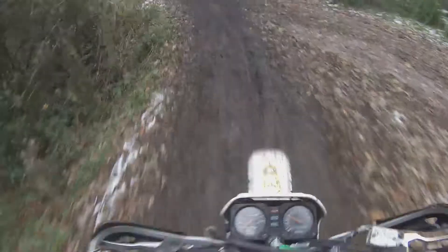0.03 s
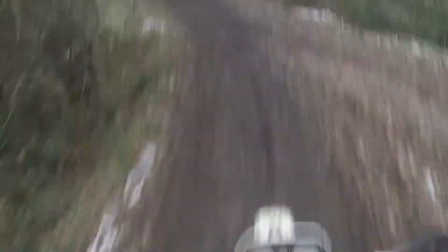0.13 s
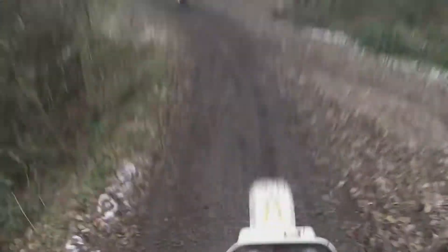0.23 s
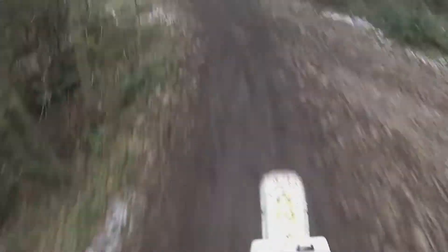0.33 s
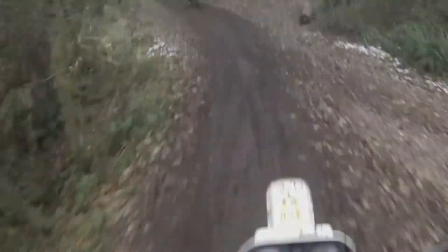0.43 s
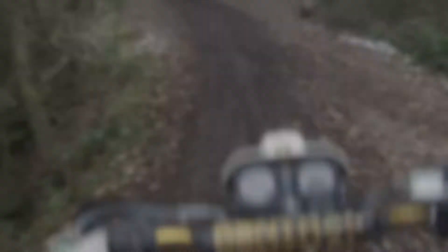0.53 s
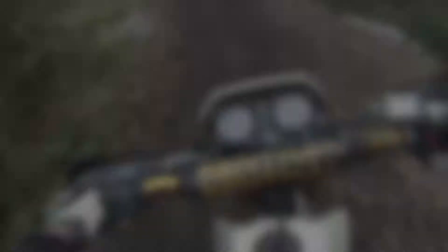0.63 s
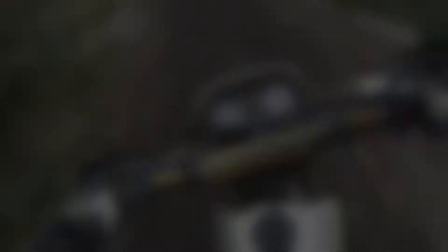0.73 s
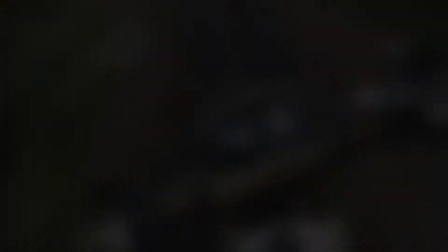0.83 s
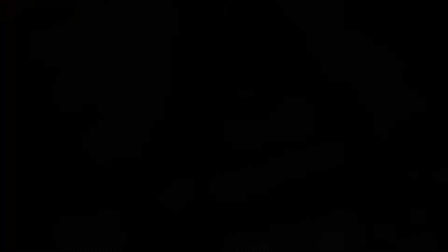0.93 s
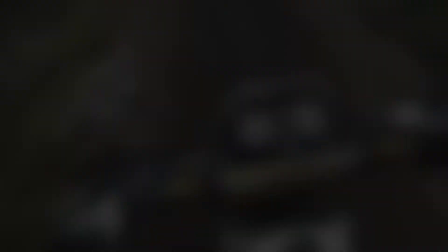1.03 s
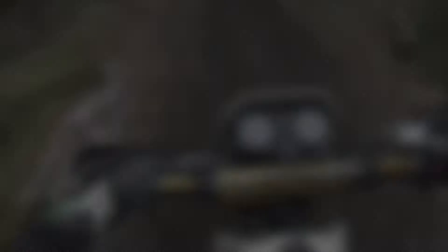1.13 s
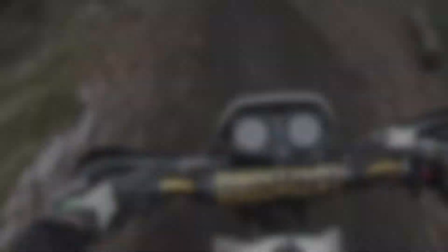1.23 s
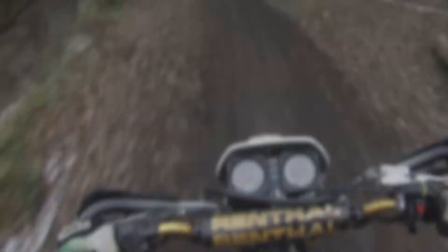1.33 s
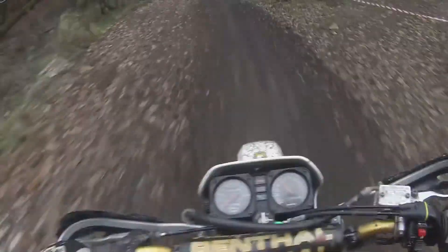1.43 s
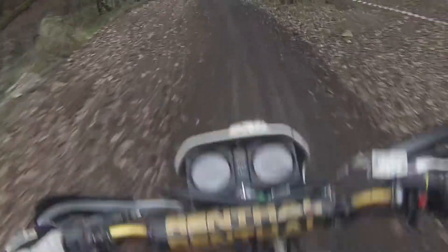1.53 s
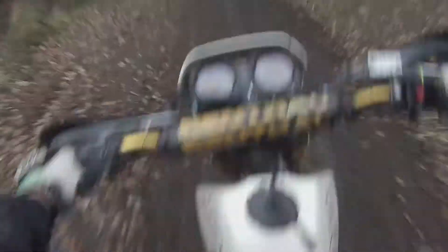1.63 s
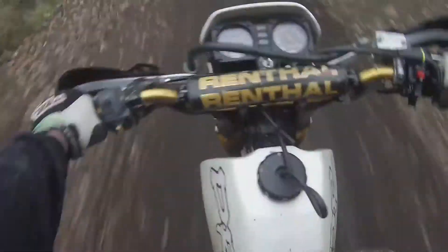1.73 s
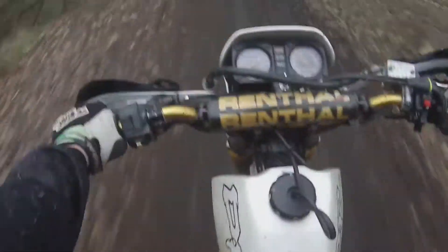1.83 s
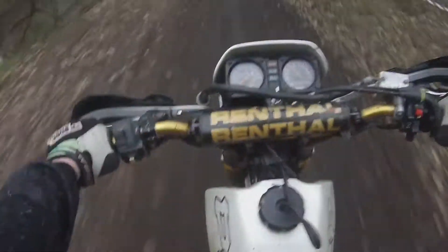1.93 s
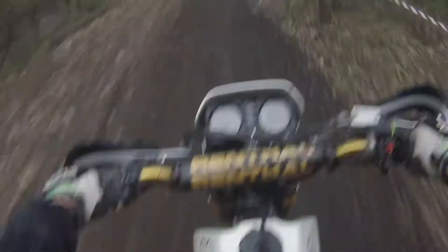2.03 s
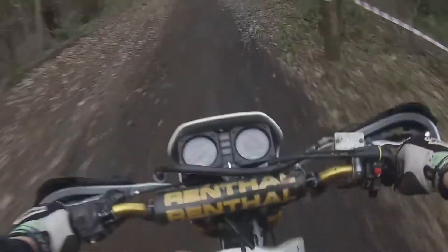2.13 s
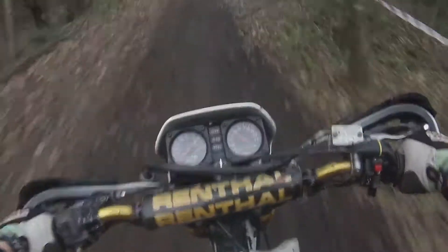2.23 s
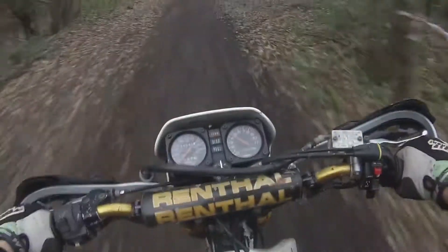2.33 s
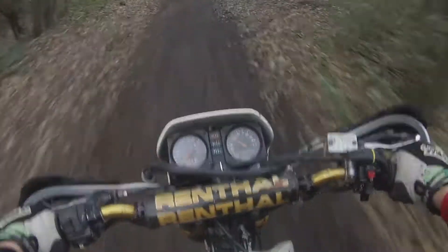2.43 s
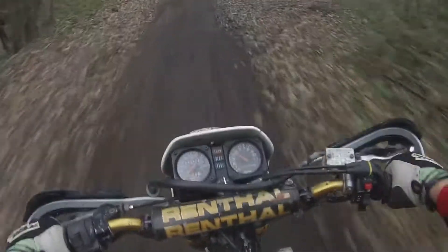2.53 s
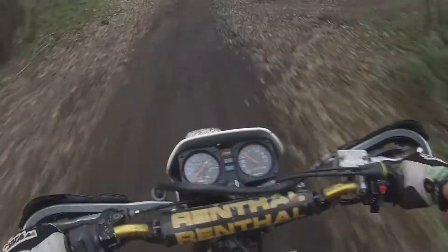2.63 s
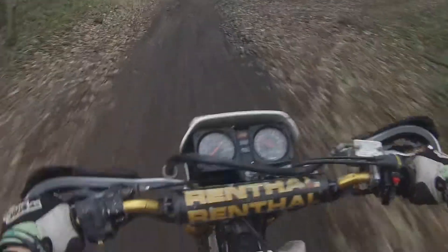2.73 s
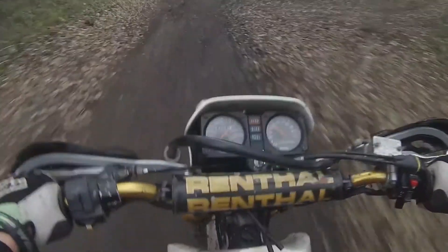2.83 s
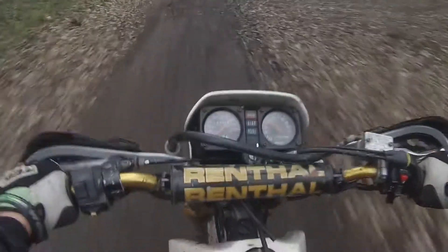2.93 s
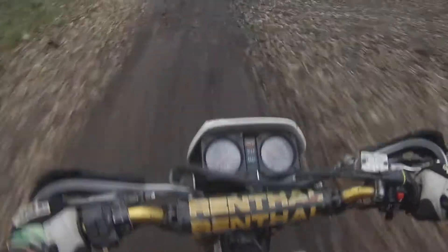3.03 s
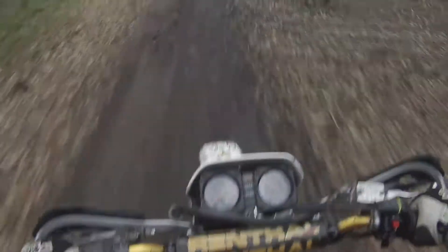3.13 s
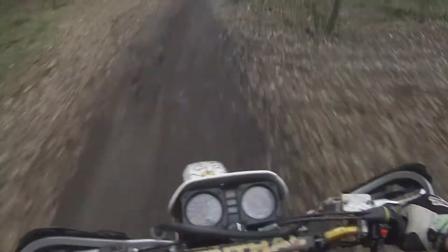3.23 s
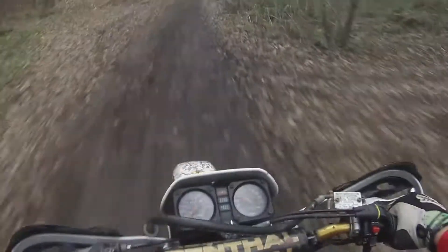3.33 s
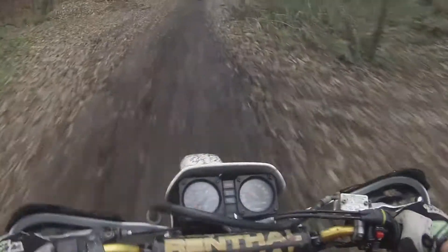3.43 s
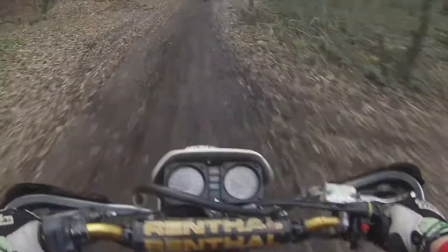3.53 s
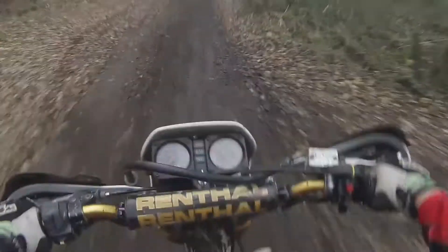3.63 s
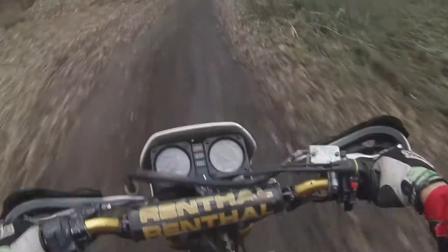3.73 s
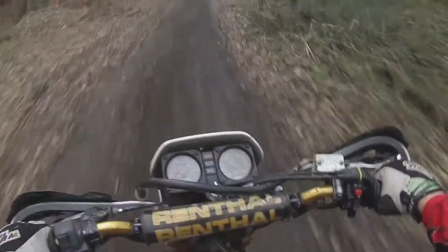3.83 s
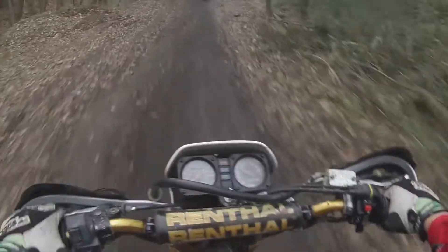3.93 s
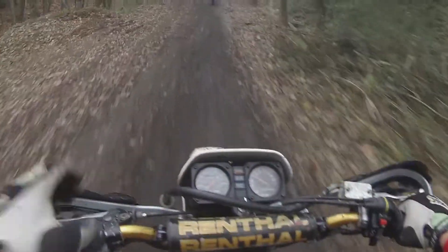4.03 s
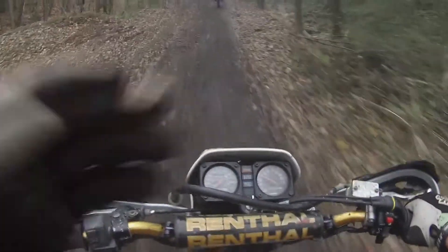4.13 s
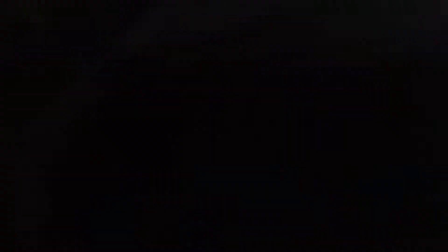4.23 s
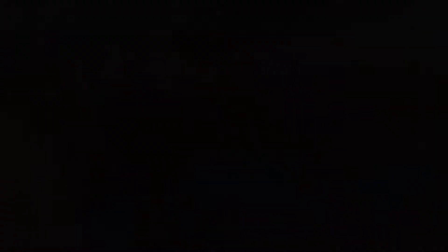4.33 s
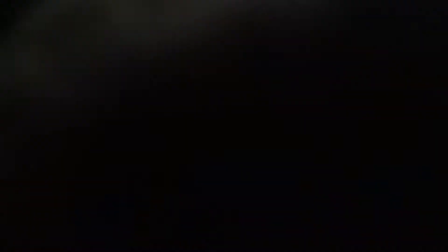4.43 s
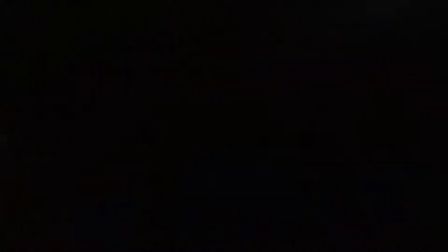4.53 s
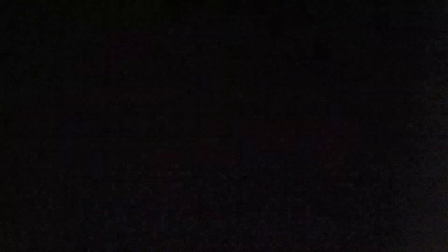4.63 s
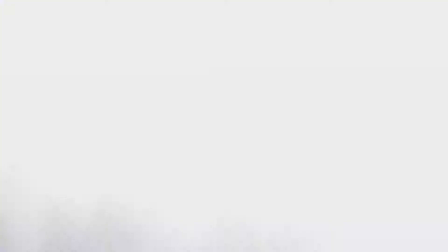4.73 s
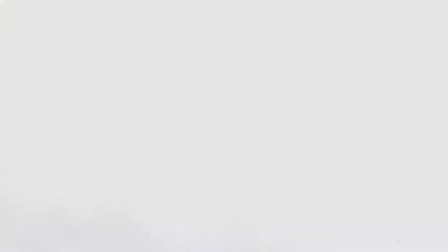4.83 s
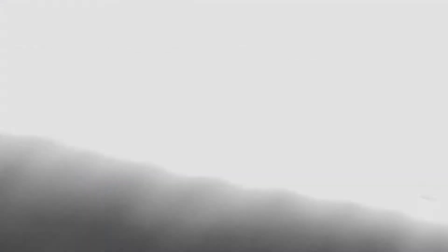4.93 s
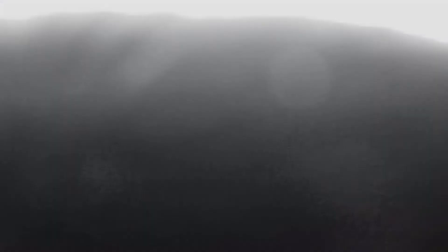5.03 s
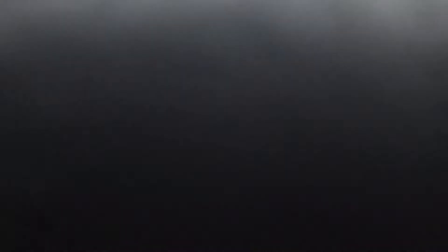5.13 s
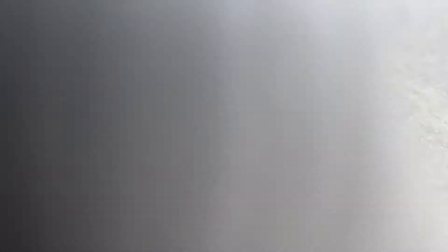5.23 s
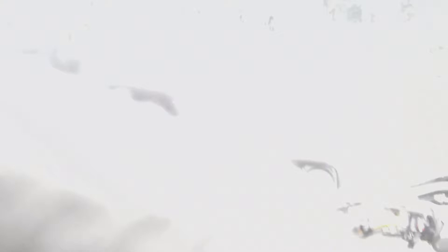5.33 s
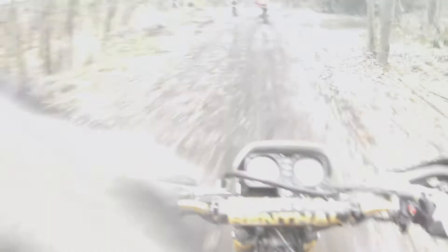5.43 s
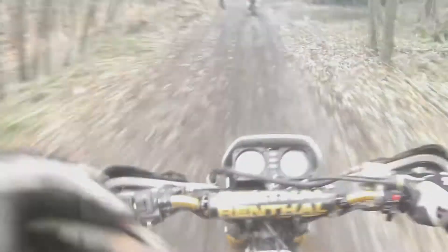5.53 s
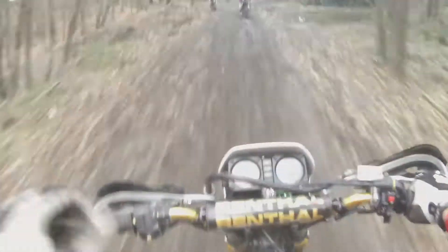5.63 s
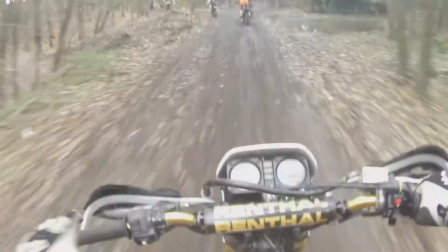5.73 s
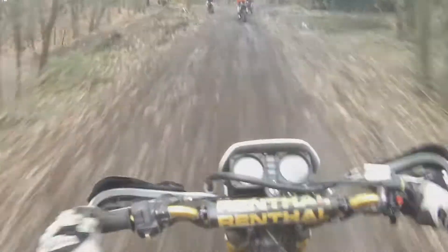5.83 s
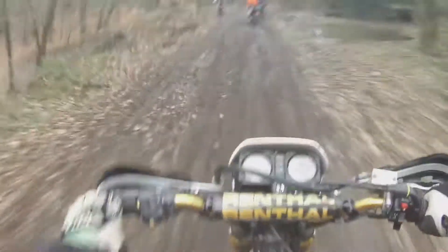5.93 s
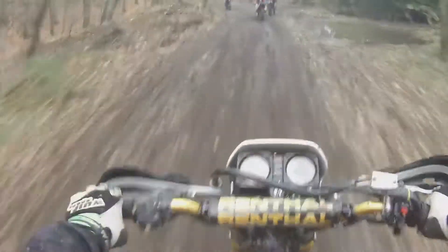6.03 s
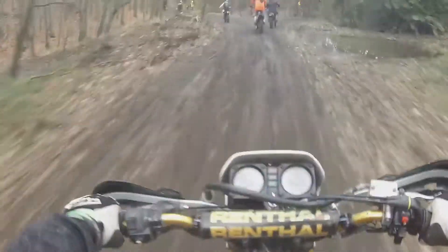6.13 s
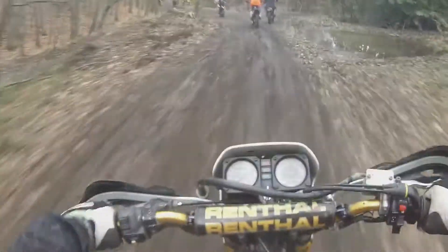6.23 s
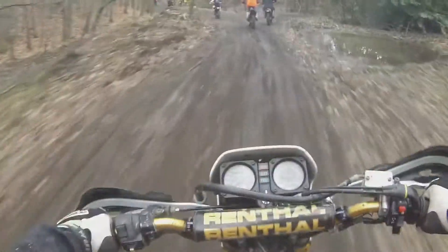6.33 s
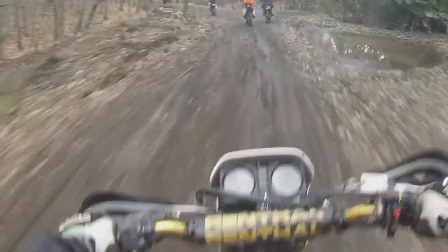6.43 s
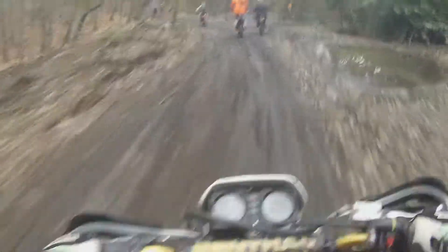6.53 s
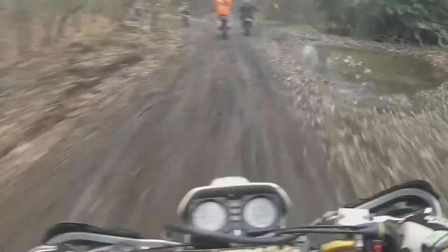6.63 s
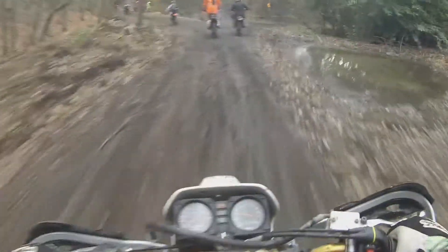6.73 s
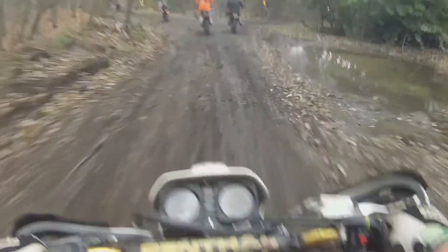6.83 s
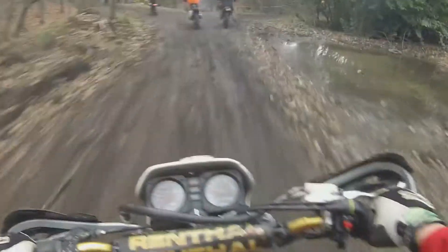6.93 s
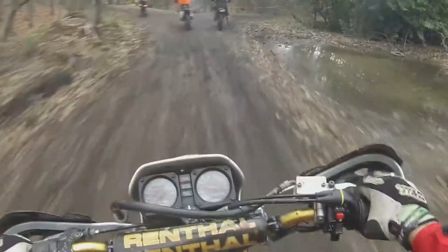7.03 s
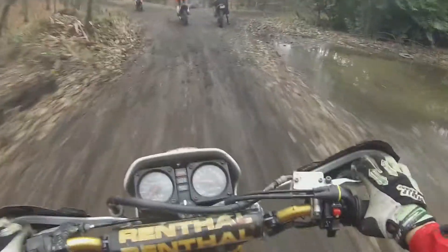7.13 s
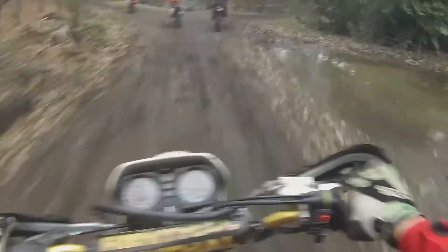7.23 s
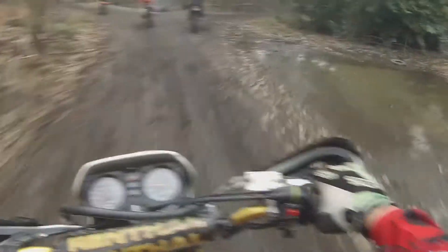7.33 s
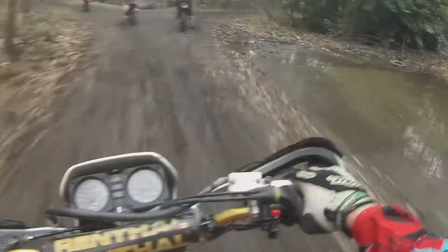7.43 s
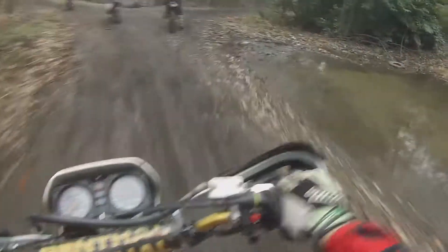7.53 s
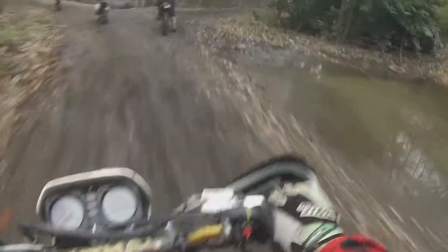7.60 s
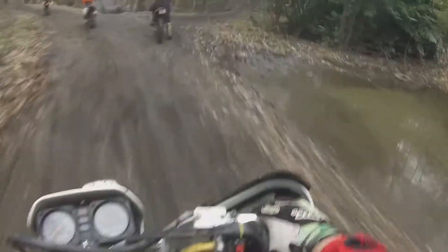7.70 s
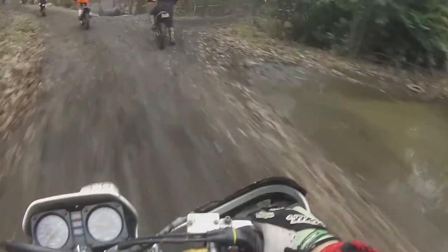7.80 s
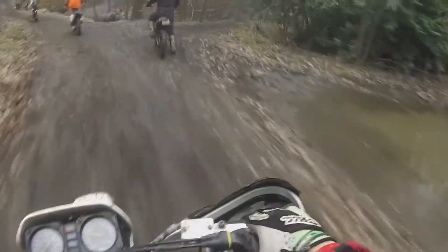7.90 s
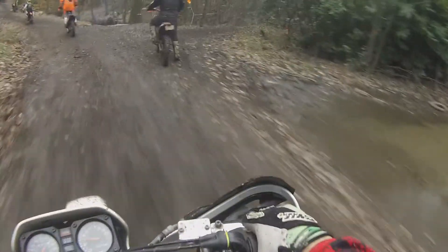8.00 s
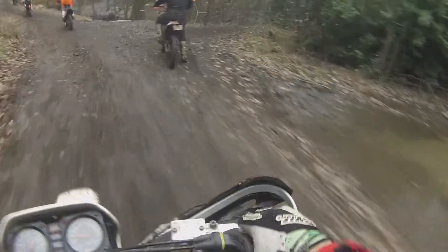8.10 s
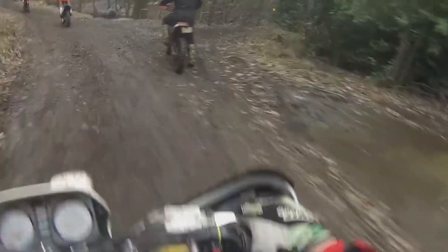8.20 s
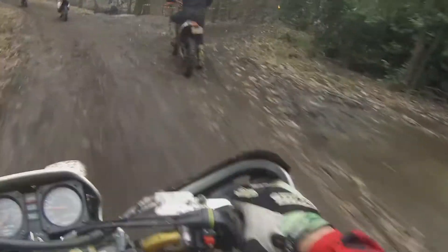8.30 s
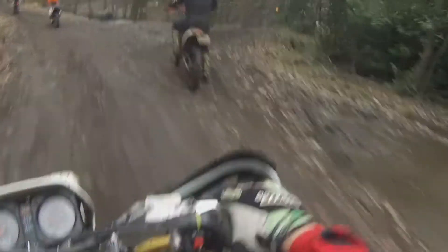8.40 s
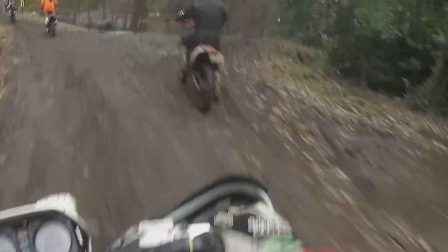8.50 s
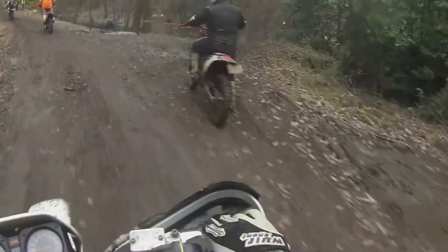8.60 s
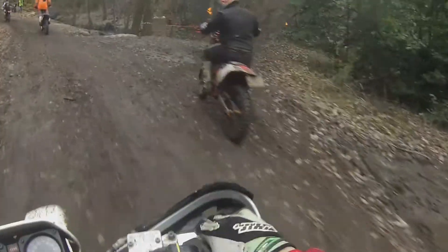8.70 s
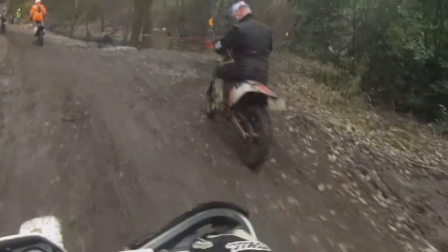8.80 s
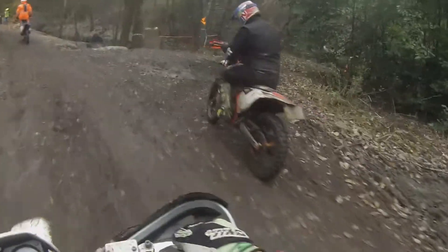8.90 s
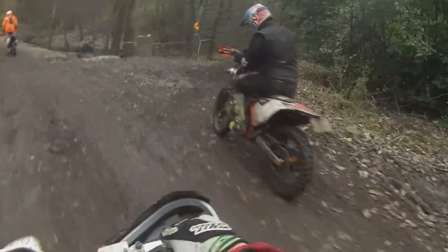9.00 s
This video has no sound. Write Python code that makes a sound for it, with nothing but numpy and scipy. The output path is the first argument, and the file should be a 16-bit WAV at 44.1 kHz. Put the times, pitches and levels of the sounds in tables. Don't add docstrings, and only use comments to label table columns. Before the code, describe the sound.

A single-cylinder trail bike barks and eases along a rough track, two hard knocks and rubbing hit the microphone housing, then a two-stroke screams nearby.

```python
import sys
import numpy as np
from scipy import signal
from scipy.io import wavfile
from scipy.ndimage import uniform_filter1d

SR = 44100
rng = np.random.default_rng(int(sys.argv[2]) if len(sys.argv) > 2 else 0)


def digitize_waveform(pressure):
    field = np.atleast_2d(pressure).T
    bounded = np.clip(field, -1, 1)
    quanta = np.round(bounded * 32767).astype(np.int16)
    wavfile.write(sys.argv[1], SR, quanta)


def gain_from_db(level_db):
    decades = np.asarray(level_db, float) / 20
    return 10 ** decades


N = 399546
T = np.arange(N) / SR


def evened(x):
    return x / np.sqrt(np.mean(x ** 2) + 1e-20)


def level(x, span):
    return x / np.sqrt(uniform_filter1d(x ** 2, size=span) + 1e-20)


def noise():
    return rng.standard_normal(N)


def wobble(span):
    once = uniform_filter1d(noise(), int(span))
    return evened(uniform_filter1d(once, int(span)))


def curves(rows):
    s, *columns = np.transpose(rows)
    return [np.interp(T, s, column) for column in columns]


def bump(s, half):
    return np.exp(-((T - s) / half) ** 2)


def swells(rows):
    return sum(db * bump(s, half) for s, db, half in rows)


def ramp(s, length):
    return np.clip((T - s) / length, 0, 1)


def add(mix, s, sound):
    part = mix[round(s * SR):][:len(sound)]
    part += sound[:len(part)]


def read(points, hz):
    f, value = np.transpose(points)
    return np.interp(np.log(hz + 1), np.log(f + 1), value, left=-90, right=-90)


def colour(x, points):
    log_gain = np.log(gain_from_db(read(points, abs(np.fft.fftfreq(16384, 1 / SR)))))
    taps = np.fft.ifft(np.exp(np.conj(signal.hilbert(log_gain)))).real[:8192]
    return signal.oaconvolve(x, taps)[:len(x)]


def resonate(x, hz, width):
    pole = np.exp((2j * np.pi * hz - np.pi * width) / SR)
    return 2 * signal.lfilter([1 - abs(pole)], [1, -pole], x).real


def ring_twice(x, hz, width, second_width):
    return resonate(resonate(x, hz, width), hz, second_width)


def pulses(turns, sizes):
    whole = np.floor(turns).astype(int)
    return np.diff(whole, prepend=whole[0]) * sizes[whole]


# (time [s], level [dB])
AIRSTREAM = [
    (0, -54),
    (1.4, -59),
    (1.7, -49.5),
    (4.3, -49.5),
    (5.6, -58),
    (9.06, -57.5),
]
# (time [s], peak level [dB], half length [s])
GUSTS = [(.29, -40, 0.11), (.71, -38, 0.069), (2.77, -44, 0.033), (3.7, -58, 0.21), (4.477, -31.5, 0.075),
         (4.758, -23, 0.086), (4.99, -36.5, 0.056), (5.29, -34.5, 0.093), (5.45, -44, .06),
         (6.1, -54, 0.27), (7.702, -51, 0.22), (8.7, -68.5, 0.075), (9.004, -63, 0.049)]
# (frequency [Hz], level [dB per Hz])
WIND_COLOUR = [(10, 5), (25, -2), (45, -14.5), (80, -17), (140, -22), (300, -45)]


def wind():
    steady = gain_from_db(curves(AIRSTREAM)[0] + 1.4 * wobble(2796))
    gusts = sum(gain_from_db(db) * bump(s, half) for s, db, half in GUSTS)
    return (steady + gusts) * level(colour(noise(), WIND_COLOUR), 9000)


# (time [s], crank speed [Hz], share of missed firings [0-1], rasp level [dB])
OTHER = [
    (7.62, 120, 0.71, -54),
    (8.05, 121.9, 0.72, -44),
    (8.3, 119.8, 0.36, -40),
    (8.46, 122.9, 0.46, -39),
    (8.57, 133.9, 0.43, -36.5),
    (8.63, 165.1, 0.29, -35.5),
    (8.8, 166, 0.06, -33.5),
    (8.91, 175.8, 0.02, -34.5),
    (9.06, 179, 0.05, -36),
]
# (time [s], change [dB], half length [s])
OTHER_LIFTS = [
    (7.91, -10, .05),
    (8.218, -10, .045),
]
# (frequency [Hz], level [dB])
OTHER_PIPE = [(100, -2.5), (260, 9), (350, 0.5), (520, -30), (880, -9.5), (1200, -15), (1620, -7.5),
              (2320, 1.5), (2600, -12.5), (3020, 6.5), (3500, -18), (4300, -15), (6300, -17.5), (9000, -69)]
# (multiple of crank speed, level [dB])
OTHER_SCREAM = [(1, -5), (2, -6), (3, -21), (4, -21), (5, -24), (6, -10), (7, -19), (8, -13), (9, -3),
                (10, -6), (11, -2), (12, -9), (13, 0), (14, -14), (15, -6), (16, -10), (17, -1), (18, -6),
                (19, -13), (20, -9), (21, -14), (22, -19), (23, -19), (24, -14), (25, -13), (26, -22),
                (27, -27)]


def two_stroke_scream(turns, hz):
    top_hz = 178
    start = N - len(hz)
    scream = 0
    for k in range(3, 28):
        place = k * hz / top_hz if k > 14 else k
        line_db = np.interp(place, *np.transpose(OTHER_SCREAM[2:])) + .1 * k + 2.5 * wobble(2500)[start:]
        scream = scream + gain_from_db(line_db) * np.cos(2 * np.pi * k * turns)
    return scream


def other_bike():
    start = round(OTHER[0][0] * SR)
    hz, missed, rasp_db = (column[start:] for column in curves(OTHER))
    missed = np.clip(missed, 0, 1)
    pipe_db = -46.5 + 0.39 * (rasp_db - rasp_db[-1])
    lift_db = swells(OTHER_LIFTS)[start:]
    hz = hz + 0.7 * lift_db
    rasp_db = rasp_db + lift_db

    unevenness = (.001 + .012 * missed) * wobble(500)[start:]
    turns = np.cumsum(hz * (1 + unevenness)) / SR
    sizes = gain_from_db(rng.standard_normal(400))
    turn = turns.astype(int)
    fired = pulses(turns, sizes) * (1 - missed * (turn % 2)) * sizes[turn] ** (.3 * missed)

    low = colour(fired, OTHER_PIPE)
    low = signal.sosfilt(signal.butter(3, [95, 480], "band", fs=SR, output="sos"), low)
    cough = missed * evened(resonate(fired, 1240, 310))
    stutter = evened(colour(fired, OTHER_PIPE[4:])) + cough
    puff_s = .0025
    puffs = noise()[start:] * signal.lfilter([1], [1, -np.exp(-1 / (puff_s * SR))], fired)

    steady = np.clip(1 - missed / .5, 0, 1)
    rasp = steady * level(two_stroke_scream(turns, hz), 6000)
    rasp += (1 - .8 * steady) * level(stutter, 6000)
    rasp += (.55 + missed) * level(colour(puffs, OTHER_PIPE[4:]), 6000)
    fade_in = np.clip(T[:len(hz)] / 0.17, 0, 1)
    out = np.zeros(N)
    add(out, OTHER[0][0], fade_in * (gain_from_db(pipe_db) * level(low, 6000) + gain_from_db(rasp_db) * level(rasp, 6000)))
    return out


# (time [s], level [dB], pitch [Hz], length [s])
SQUEAKS = [
    (.01, -53, 6900, 0.043),
    (0.407, -51, 6430, 0.036),
    (.41, -57, 11290, .04),
    (4.95, -50, 6060, 0.017),
]


def squeaks():
    out = np.zeros(N)
    for s, db, hz, length in SQUEAKS:
        t = T[:int(length * SR)]
        add(out, s, gain_from_db(db) * np.sin(2 * np.pi * hz * t) * np.sin(np.pi * t / length))
    return out * gain_from_db(3.3 * wobble(60))


# (start [s], length [s], level [dB], change along it [dB], treble over it [dB])
STROKES = [
    (4.329, 0.11, -32.5, -10, -9),
    (4.445, 0.063, -36.5, -2.5, -7.5),
    (4.55, 0.072, -36.5, -16, -12),
    (4.625, 0.32, -30, -3.5, -9),
    (4.995, 0.065, -42, -8.5, -12),
    (5.1, 0.12, -44, -8.5, -18),
    (5.22, 0.097, -44.5, -0.5, -15),
    (5.311, 0.18, -37, -7, -9),
]
# (frequency [Hz], level [dB per Hz])
CLOTH = [(65, -33), (110, -8), (145, -9), (291, -16), (334, -16), (797, -26), (1030, -20.5), (1600, -9.5),
         (2180, -7.5), (2590, -2), (3020, -10), (5480, -14), (6500, -25.5), (8450, -64), (14300, -120)]
# (frequency [Hz], level [dB per Hz])
CLOTH_TOP = [(3240, -22), (5500, -1.5), (6450, -4), (7730, 0.5), (8110, -2), (9980, -9), (12000, -7.5),
             (15400, -22)]


def wipe():
    touch_s, lift_s = 0.0095, 0.017
    drag_hz, drag_width_hz, drag_db = 1140, 410, -56
    body, top, dull = np.zeros((3, N))
    for s, length, db, change_db, top_db in STROKES:
        along = ramp(s, length)
        speed = np.sin(np.pi * along)
        touch = ramp(s, touch_s) - ramp(s + length - lift_s / 2, lift_s)
        press = gain_from_db(db + change_db * along + 2.5 * speed) * touch
        body += press
        top += gain_from_db(top_db + 5 * (speed - 0.63)) * press
        dull += gain_from_db(drag_db) * touch
    slips = noise() * gain_from_db(1.2 * wobble(53.8) + 1.3 * wobble(400))
    drag = ring_twice(slips, drag_hz, drag_width_hz, drag_width_hz)
    return body * evened(colour(slips, CLOTH)) + top * evened(colour(slips, CLOTH_TOP)) + dull * evened(drag)


# (time [s], size [inward +, outward -], swing [Hz], heaviest point [swings], crack [dB])
KNOCKS = [
    (4.3337, .79, 57, .45, -36),
    (4.3474, .5, 78, .78, -20),
    (4.4197, -.67, 68, .47, -27),
    (4.783, -.126, 75, .4, -40),
    (5.221, -.07, 62, .4, -50),
    (5.489, -.05, 70, .4, -50),
    (7.24, .0126, 75, .6, -60),
]
# (time [s], peak level [dB])
TICKS = [(1.226, -40), (1.709, -26), (1.7793, -28), (2.6673, -32), (2.7571, -17.5), (4.411, -20),
         (4.5562, -40), (5.033, -26), (7.4757, -30), (7.6813, -28), (7.725, -29), (8.1603, -29)]
# (frequency [Hz], level [dB])
CRACK = [(200, -4), (400, 4.5), (1000, 3), (2200, 8.5), (3300, -8), (4700, -1.5), (8000, -10.5),
         (14000, -23), (16000, -50)]


def knocks():
    push, crack, jolt = np.zeros((3, N))
    t = T[:2000]
    for s, way, hz, heaviest, crack_db in KNOCKS:
        wave = np.sin(2 * np.pi * hz * t)
        pointed = .15 * wave + .85 * np.arcsin(.99 * wave) * 2 / np.pi
        add(push, s, way * pointed * np.exp(-((hz * t - heaviest) / .5) ** 4))
        burst = gain_from_db(crack_db) * np.exp(-t / .0022) * rng.standard_normal(len(t))
        add(crack, s, burst if way > 0 else uniform_filter1d(burst, size=7) * 2)
    for s, db in TICKS:
        add(jolt, s, gain_from_db(db) * np.exp(-t / .002) * rng.standard_normal(len(t)))
    ring = gain_from_db(8) * resonate(jolt, HOUSING[0][0], 150)
    shell = gain_from_db(9) * colour(crack + gain_from_db(-10) * np.diff(jolt, prepend=0), CRACK)
    trapped_air = gain_from_db(-3.5) * resonate(push, 65.6, 8.7)
    return push + trapped_air + shell + ring


def valves(turns, hz, easing_db):
    ring_hz, ring_t60 = 8320, .025
    lag = 0.79
    tick_db = 2.5 * rng.standard_normal(400) + 4.0 * (-1) ** np.arange(400)
    t = T[:900]
    ring = gain_from_db(-60 * t / ring_t60) * np.sin(2 * np.pi * ring_hz * t) * np.minimum(t / .001, 1)
    ticks = signal.oaconvolve(pulses(turns + lag, gain_from_db(tick_db)), ring)[:N]
    return gain_from_db(-51 + 2 * easing_db - (hz - SLOW_HZ)) * ticks


# (frequency [Hz], level [dB per Hz])
HISS = [(2350, -4), (4000, 4), (4380, -7.5), (4870, -3), (5310, 8), (5740, 3.5), (6610, -0.5), (7320, 3.5),
        (7920, -0.5), (8580, 2.5), (9390, -2.5), (10000, -2), (12100, -7), (14600, -10), (15400, -35)]
# (pitch [Hz], width [Hz], level [dB])
SHELL = [(5210, 100, -7.5), (7377, 91, -11.5), (9060, 450, -12), (9780, 350, -11.5), (11900, 190, -15)]


def housing_hiss(shake):
    air = level(noise() * shake ** 0.69 * gain_from_db(1.02 * wobble(510)), 8000)
    buzz = 0
    for hz, width, db in SHELL:
        buzz = buzz + gain_from_db(db + 4.8 * wobble(1850)) * evened(ring_twice(air, hz, width, 2 * width))
    return evened(colour(air, HISS)) + gain_from_db(-9) * buzz


# (pitch [Hz], width [Hz], level [dB])
HOUSING = [(1611, 114, 5), (2589, 330, -7.5), (2897, 315, -4), (3610, 378, -3.5)]
# (frequency [Hz], level [dB per Hz])
HOUSING_BED = [(900, -57), (1300, -12.5), (2100, -7), (3800, -13.5), (4300, -16.5), (5000, -25)]
# (time [s], rise [dB], half length [s])
RUTS = [
    (1.11, 7, 0.1),
    (1.57, 6.5, 0.033),
    (2.3, 5, 0.093),
    (2.553, 9.5, .1),
    (3.177, 10, 0.15),
    (3.514, 13, 0.057),
    (4.0, 10.5, 0.2),
]


def housing_rattle(shake, rattle_db):
    drive = level(noise() * shake * gain_from_db(0.34 * wobble(460)), 6000)
    smooth = level(noise() * shake ** 0.5 * gain_from_db(1.37 * wobble(350)), 6000)
    (main_hz, main_width, main_db), *upper = HOUSING
    sing = evened(resonate(drive, 1615, 44))
    whine = evened(ring_twice(drive, main_hz, main_width, 5 * main_width))
    whine += gain_from_db(-11.5 + swells(RUTS)) * sing
    whine *= np.sqrt(np.pi * main_width / SR)
    modes = gain_from_db(main_db + 0.39 * (rattle_db + 44.5)) * whine
    for hz, width, db in upper:
        modes += gain_from_db(db + 1.5 * wobble(2200)) * ring_twice(smooth, hz, width, 2 * width)
    return evened(evened(modes) + gain_from_db(-10.0) * evened(colour(smooth, HOUSING_BED)))


# (frequency [Hz], level [dB])
PIPE = [(30, -9), (140, -7.5), (250, -2.5), (310, -1.5), (365, -7.5), (450, -11), (525, -7), (585, -18.5),
        (660, -7), (740, -14.5), (800, -22), (1100, -54)]
FULL_LOAD = [-15, -6, -15, -30, -7, 0, -6, -12]


def exhaust_note(turns, hz, wide):
    turns, hz, wide = turns[::16], hz[::16], wide[::16]
    note = 0
    for k in range(1, 25):
        pipe_db = read(PIPE, k * hz) - 20 * (k == 4)
        full_db = pipe_db - 6.0 - 0.82 * np.maximum(hz - 43, 0)
        if k <= len(FULL_LOAD):
            full_db = FULL_LOAD[k - 1]
        drift, waver = uniform_filter1d(rng.standard_normal((2, len(hz))), size=160) * np.sqrt(160)
        lag = rng.uniform(-.5, .5) - 1.15 * wide * (k == 6)
        lag = lag + .2 * (1 - wide) * max(11 - k, 0) ** 2
        lag = lag - .2 * wide * (8 < k < 15) * (k - 9) ** 2
        phase = 2 * np.pi * k * turns + (.014 - .005 * wide) * k * drift + lag
        size_db = wide * full_db + (1 - wide) * pipe_db + (2 - 1.2 * wide) * waver
        note += gain_from_db(size_db) * np.cos(phase)
    return signal.resample_poly(note, 16, 1)[:N]


# (frequency [Hz], level [dB per Hz])
DRONE = [(35, -39), (60, -6), (97, -13), (128, -7), (194, -8), (257, -5.5), (398, -12), (632, -17),
         (748, -19.5), (1300, -20.5), (1690, -55), (2860, -120)]


def exhaust(turns, hz, clean, wide):
    bark = level(exhaust_note(turns, hz, wide), 8000)
    drone = level(colour(noise() * gain_from_db(1.63 * wobble(250)), DRONE), 9000)
    return np.sqrt(clean) * bark + np.sqrt(1 - clean) * drone


def fourth_multiple(turns, hz, wide):
    hum_db = -60.5 + 0.8159 * np.minimum(hz - SLOW_HZ, 11.3)
    return gain_from_db(hum_db + 5.0 - 4.0 * wide + 1.4 * wobble(1550)) * np.sin(8 * np.pi * turns)


# (open [s], shut [s], clean firing share [0-1], wide open [0-1], pull on the revs [Hz])
THROTTLE = [
    (.13, .4, 0.51, 0.03, 0),
    (0.46, 0.7, 0.71, 0.3, 0),
    (0.79, 1.646, 0.89, 0.98, 2.5),
    (1.844, 2.257, 0.79, 0, 1.73),
    (2.307, 2.678, 0.66, 0.01, 0),
    (4.9, 5.61, 0.37, 0, 0),
    (5.618, 6.219, 0.37, 0, 2.5),
]


def throttle():
    twist_s, load_up_s = 0.073, .25
    shut_clean = 0.12
    out = np.zeros((3, N))
    for on, off, clean, wide, pull in THROTTLE:
        opening = ramp(on, twist_s) - ramp(off - twist_s / 2, twist_s)
        out += [(clean - shut_clean) * opening, wide * opening * ramp(on, load_up_s), pull * opening]
    return np.clip(out[0] + shut_clean, 0, 1), np.clip(out[1], 0, 1), out[2]


SLOW_HZ, CALM_DB = 25, -42
# (time [s], firing rate [Hz], shaking level [dB], lifted at the end by the bike ahead)
REVS = [(0, 31.65, -45), (.3, 33.62, -38.5), (.48, 34.47, -42.5), (.63, 36.34, -38.5), (.77, 32.2, -40.5),
        (1.1, 39.34, -37), (1.2, 37, -37.5), (1.42, 38.4, -37.5), (1.58, 46.87, -35), (1.76, 40.6, -35.5),
        (1.84, 32.57, -39.5), (2.36, 34.23, -40), (2.65, 38.49, -38), (2.76, 32.89, -40),
        (4.26, 30.73, -43), (6.3, 25.81, -44.5), (7.55, 22.16, -45), (7.9, 25.16, -41)]


def engine():
    hz, rattle_db = curves(REVS)
    clean, wide, pull = throttle()
    hz = hz + pull
    easing_db = -1 * ramp(7.6, 0.2)
    shaking_db = rattle_db - CALM_DB
    exhaust_db = easing_db - 49 + 11 * clean ** 2 + 0.71 * shaking_db
    hiss_db = easing_db - 12 - 0.39 * shaking_db + 0.2375 * (hz - SLOW_HZ)
    turns = np.cumsum(hz * (1 + .004 * wobble(900))) / SR

    size_db = 1.4 * rng.standard_normal(400)
    shake = (0.38 + 1.1 * clean) * gain_from_db(size_db[turns.astype(int)]) * np.exp(-(turns % 1) / 0.58)
    shake = 1 + uniform_filter1d(shake, size=90)
    housing = housing_rattle(shake, rattle_db) + gain_from_db(hiss_db) * housing_hiss(shake)

    pipe = gain_from_db(exhaust_db) * exhaust(turns, hz, clean, wide) + fourth_multiple(turns, hz, wide)
    return pipe + gain_from_db(rattle_db) * housing + valves(turns, hz, easing_db)


def scene():
    return (wind() + other_bike() + squeaks() + wipe() + knocks() + engine())[None]


def top_cut(x):
    return signal.sosfilt(signal.butter(12, 15580, fs=SR, output="sos"), x)


def record(dry):
    return top_cut(dry)


dry = scene()
out = record(dry)
digitize_waveform(out)
```